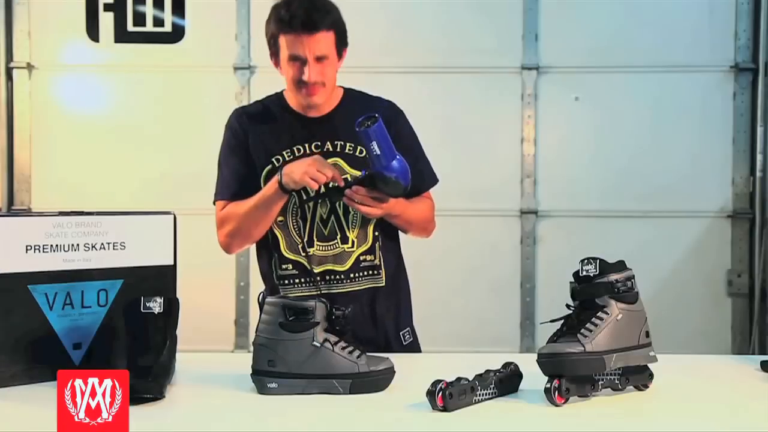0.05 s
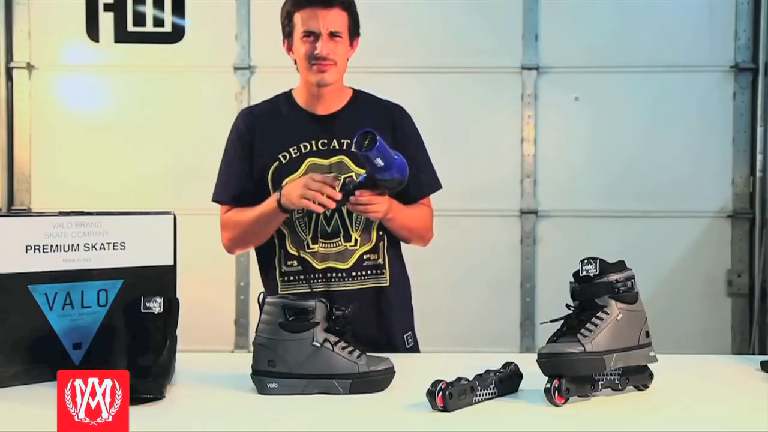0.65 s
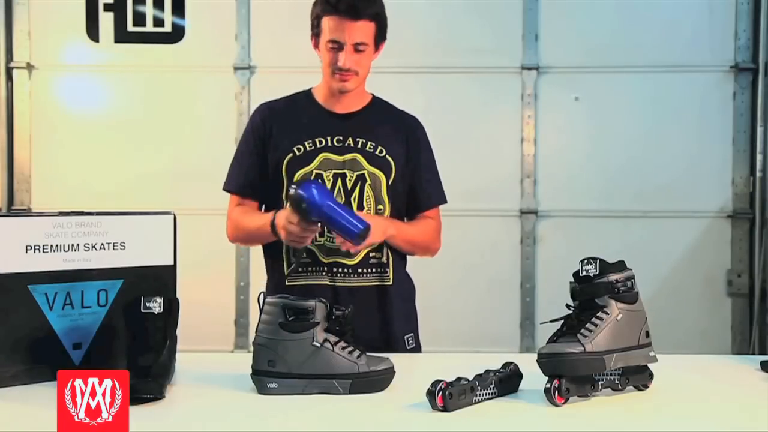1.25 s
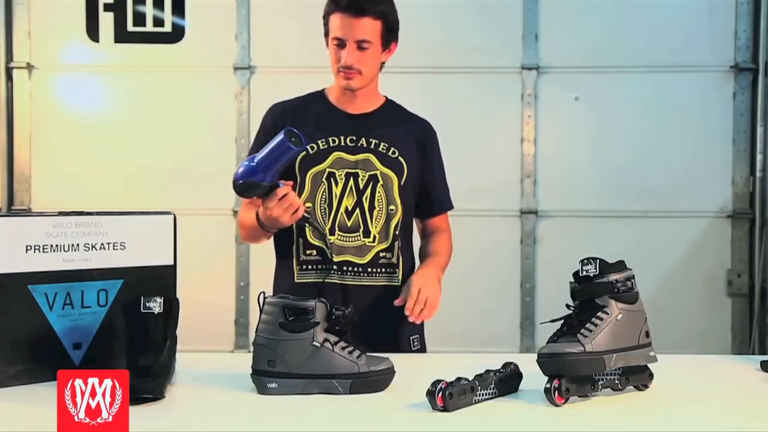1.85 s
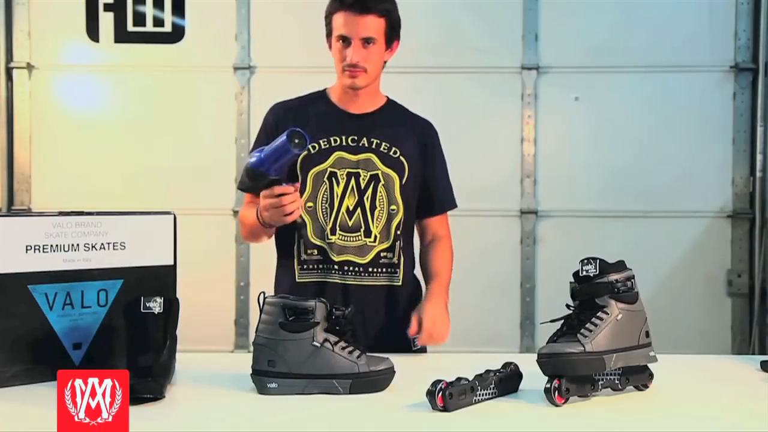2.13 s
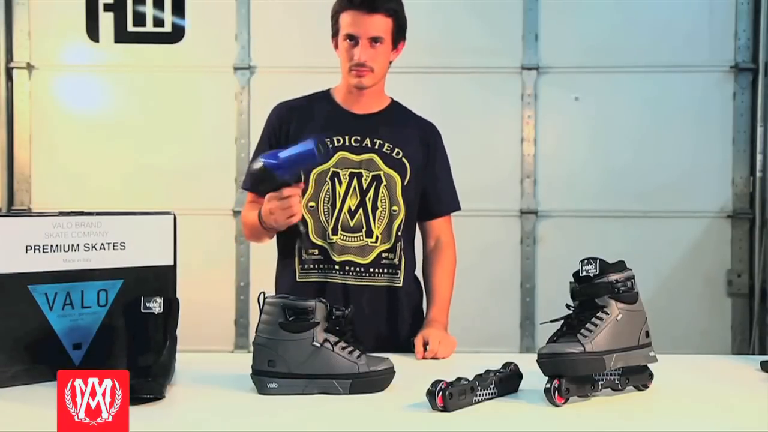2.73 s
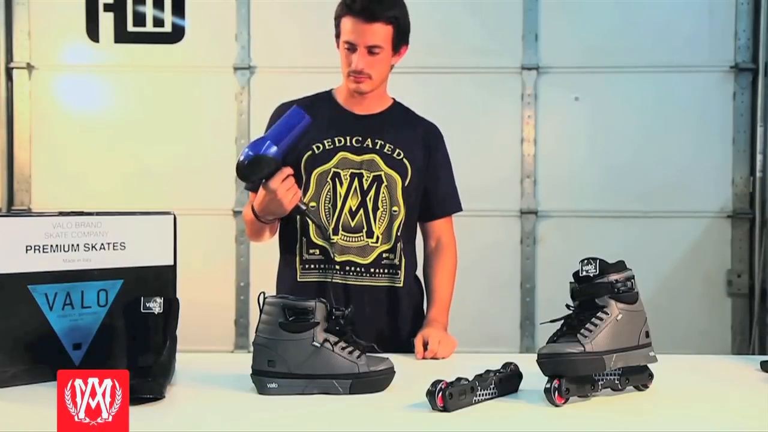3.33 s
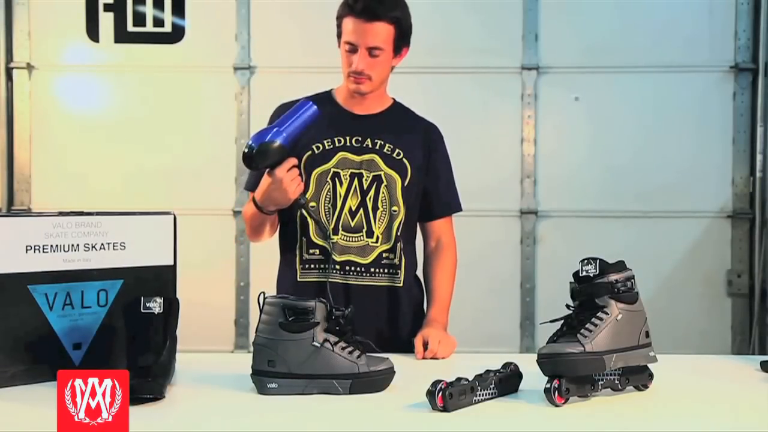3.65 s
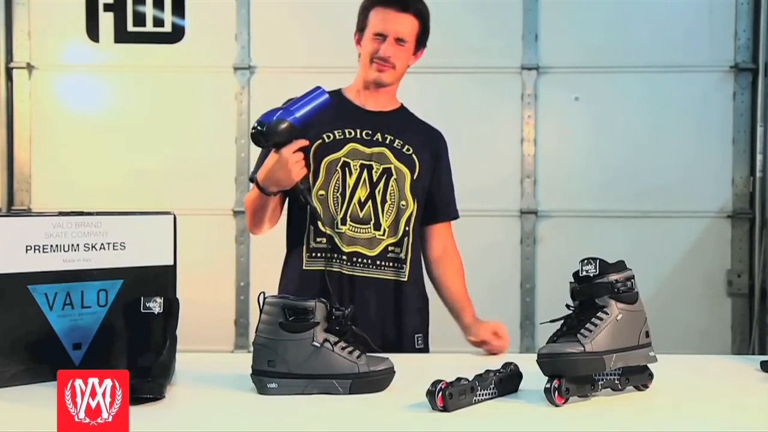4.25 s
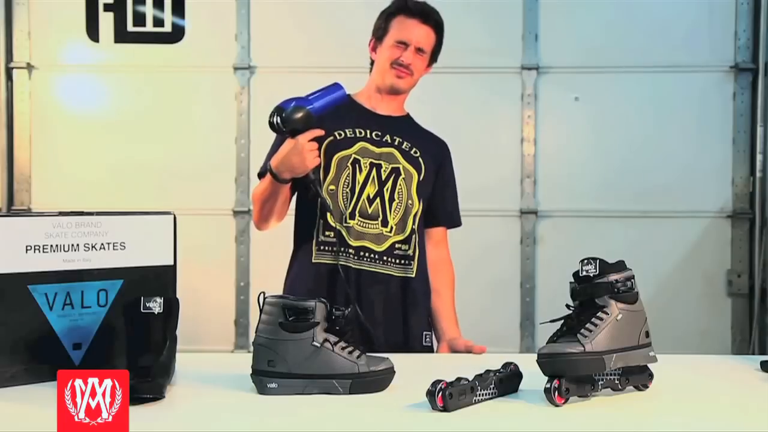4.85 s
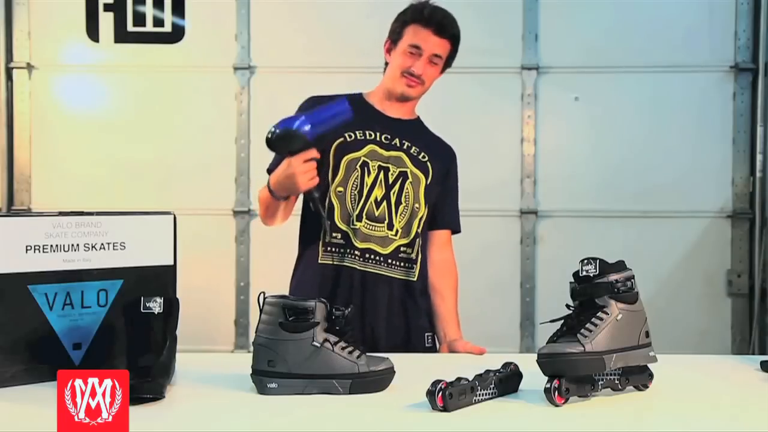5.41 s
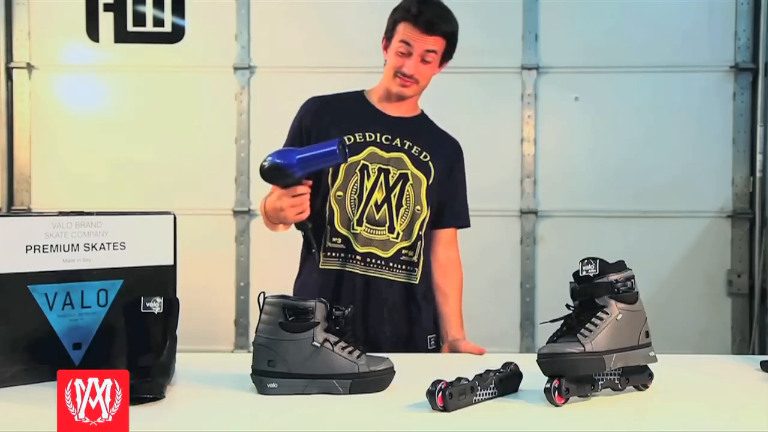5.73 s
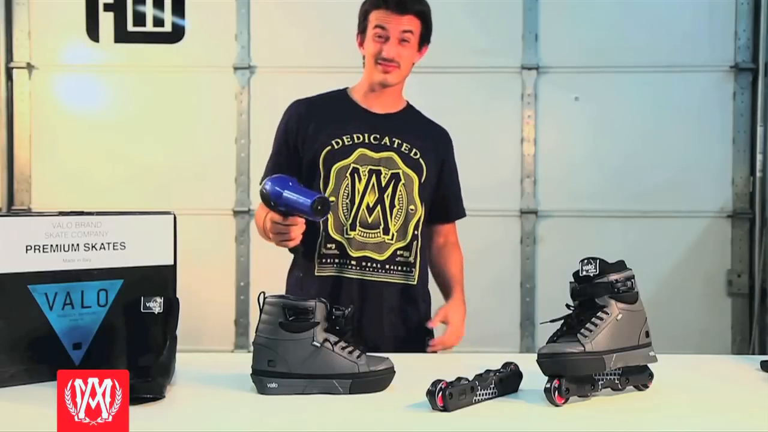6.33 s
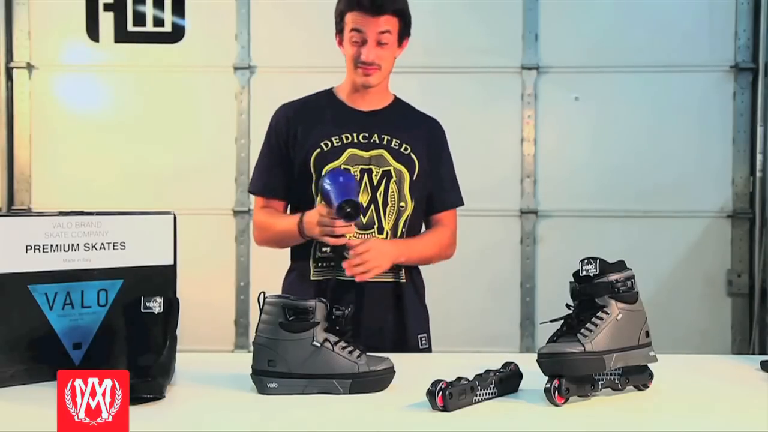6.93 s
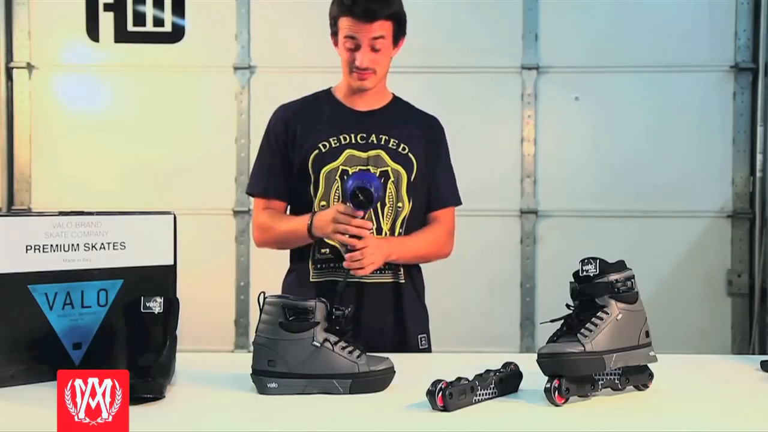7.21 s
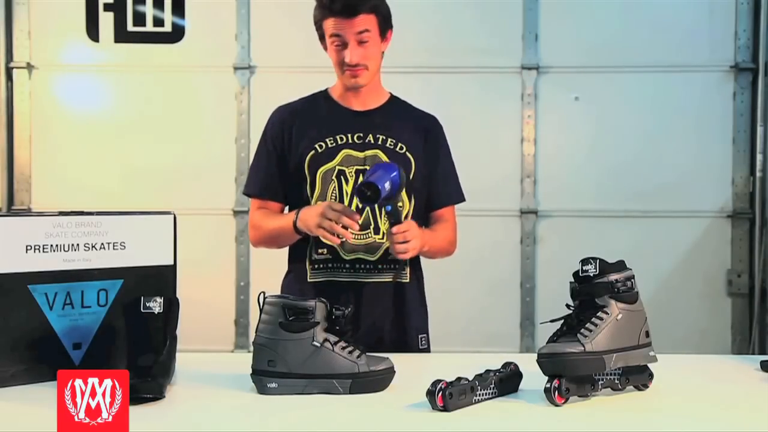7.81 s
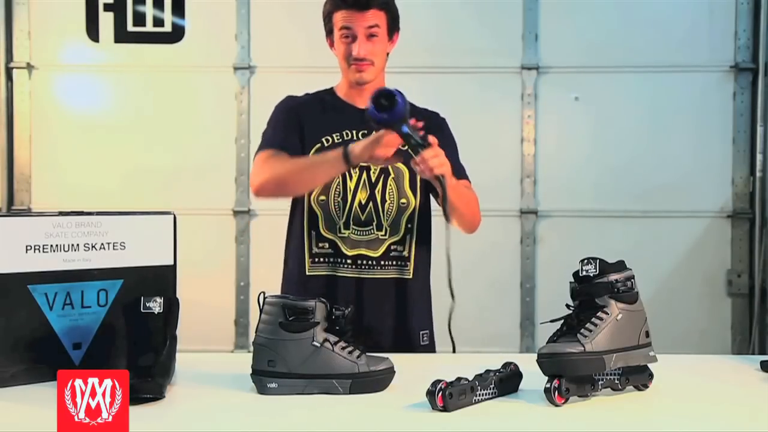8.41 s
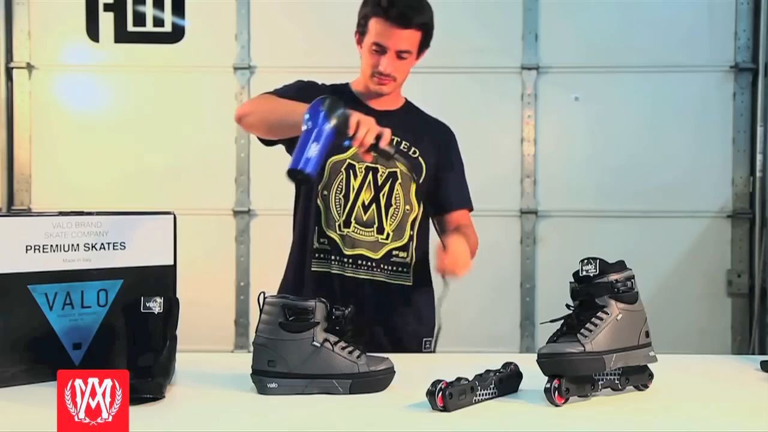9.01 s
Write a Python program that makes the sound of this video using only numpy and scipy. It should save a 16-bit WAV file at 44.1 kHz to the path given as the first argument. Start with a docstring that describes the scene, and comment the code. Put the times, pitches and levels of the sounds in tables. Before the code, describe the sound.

With a plastic switch snap, a hair dryer starts up and keeps blowing, its hiss brightening and dulling slightly as it moves.

```python
"""In a garage, a step or two from the microphone, a handheld hair dryer is switched on and runs.
The switch snaps and rings its plastic shell, then the motor spins up against its inertia. Turbulent air
rushes through the resonant housing and whistles at the grille, over the hum of rotor imbalance and the
whine of the blades. As the dryer is turned about, the beamed hiss brightens and dulls and the tones
swell and fade by interference. Near the end the jet blows on a hand with a hollow, sinking note."""
import sys
import numpy as np
from scipy import signal
from scipy.fft import rfft, irfft, next_fast_len
from scipy.io import wavfile

SR = 44100
rng = np.random.default_rng(int(sys.argv[2]) if len(sys.argv) > 2 else 0)


def transcribe(u):
    """Save the signal u as a 16-bit wav file named by the first command-line argument.

    u: samples, shape (n,) or (channels, n), limited to [-1, 1]; the rate is SR.
    q: integer samples, one column per channel.
    """
    v = np.clip(np.atleast_2d(u).T, -1, 1)
    q = np.round(v * 32767).astype(np.int16)
    wavfile.write(sys.argv[1], SR, q)


N = 403956
TIME = np.arange(N) / SR
FFT_SIZE = next_fast_len(N, True)
BIN_HZ = np.maximum(np.arange(FFT_SIZE // 2 + 1) * SR / FFT_SIZE, 1)
SWITCH_S = .1347


def from_db(db):
    """Amplitude ratio of a level in decibels."""
    return 10 ** (np.asarray(db) / 20)


def rms_one(x):
    """Normalisation to unit rms."""
    return x / np.sqrt(np.mean(x ** 2) + 1e-20)


def in_time(rows):
    """Linear interpolation of each column of a time table at every sample."""
    times, *columns = np.transpose(rows)
    return [np.interp(TIME, times, column) for column in columns]


def spectrum(points):
    """Interpolation of (frequency, value) points on a logarithmic frequency axis."""
    hz, values = np.transpose(points)
    return np.interp(np.log(BIN_HZ), np.log(hz), values)


def colour(x, gain):
    """Zero-phase filtering with one gain per frequency."""
    return irfft(rfft(x, FFT_SIZE) * gain, FFT_SIZE)[:N]


def noise(shape_db):
    """Spectral shaping of white noise, rms 1."""
    return rms_one(colour(rng.standard_normal(N), from_db(shape_db)))


def drift(corner_hz, step=16):
    """Slow random fluctuation: low-pass noise of rms 1, drawn every `step` samples."""
    size = next_fast_len(N // step + 2, True)
    hz = np.arange(size // 2 + 1) * SR / step / size
    slow = irfft(rfft(rng.standard_normal(size)) / (1 + (hz / corner_hz) ** 2), size)
    return np.interp(np.arange(N) / step, np.arange(size), rms_one(slow))


def narrow_noise(pitch_hz, width_hz):
    """Random quadrature modulation: a breathy band around a pitch that may glide, rms 1."""
    angle = 2 * np.pi * np.cumsum(pitch_hz * np.ones(N)) / SR
    return drift(width_hz / 2) * np.cos(angle) + drift(width_hz / 2) * np.sin(angle)


def ring(clicks, hz, t60_s):
    """Damped oscillator: each impulse starts a decaying sine."""
    radius, omega = from_db(-60 / (t60_s * SR)), 2 * np.pi * hz / SR
    return signal.lfilter([0, np.sin(omega)], [1, -2 * radius * np.cos(omega), radius ** 2], clicks + 1e-18)


# Noise spectrum of the still room: (frequency [Hz], relative density [dB])
ROOM_SPECTRUM = [(24, -34), (40, -12), (95, -5), (112, -12), (149, -2), (228, -1), (288, -0.5), (755, -3),
                 (7040, -3.5), (11000, -23), (14300, -73), (22000, -120)]
# Faint hum of the room: (frequency [Hz], level [dB])
ROOM_HUM = [(90, -73.5), (120, -65.5), (143, -68.5)]

def room_tone(hiss_db=-48.5):
    """Ambient noise floor: broadband hiss, with a wavering hum and uneven rumble of narrowband noise."""
    hum = sum(from_db(db) * narrow_noise(hz, width_hz=6) for hz, db in ROOM_HUM)
    rumble = from_db(-71 + 4.5 * drift(4)) * narrow_noise(pitch_hz=62, width_hz=65)
    return from_db(hiss_db) * noise(spectrum(ROOM_SPECTRUM)) + hum + rumble


def garage(x, wet_db=-3.5, build_s=0.0036, t60_s=0.43):
    """Reverberation: dense reflections build up within milliseconds and decay exponentially."""
    t = TIME[:SR]
    tail = rng.standard_normal(SR) * (1 - np.exp(-t / build_s)) * from_db(-60 * t / t60_s)
    return x + from_db(wet_db) * signal.fftconvolve(x, tail / np.linalg.norm(tail))[:N]


def near_echoes(x, count=7, echo_gain=.15, sway_s=.0004):
    """Comb filtering: paths via table, body and door vary as the hand moves, so soft peaks wander."""
    bounced = signal.sosfilt(signal.butter(1, [600, 4000], "band", fs=SR, output="sos"), x)
    out = x
    for delay_s in rng.uniform(.004, .026, count):
        moving_delay_s = delay_s + sway_s * drift(.45)
        out = out + echo_gain * np.interp(TIME - moving_delay_s, TIME, bounced)
    return out * np.std(x) / np.std(out)


# Impacts of the switch contacts: (time after the snap [s], level [dB])
CONTACT_IMPACTS = [(0, 3), (.0007, -19), (.0016, -8), (.0024, -13), (.0035, -10), (.014, -21), (.018, -11)]
# Modes of the plastic shell: (frequency [Hz], gain [dB], decay time T60 [s])
SHELL_MODES = [(735, -40, 0.038), (1340, -29.5, 0.013), (1830, -26, 0.0083), (2740, -26, 0.0087),
               (3700, -18.5, 0.0037), (4930, -9, .003), (5900, -4.5, 0.0017), (7170, -8.5, 0.0016),
               (9500, -22.5, 0.0032)]

def switch(slide_db=-44, slide_s=0.0036):
    """Impact excitation: the slider scrapes, snaps over and chatters, ringing the modes of the shell."""
    force = from_db(slide_db) * rng.standard_normal(N) * np.exp(-np.abs(TIME - SWITCH_S) / slide_s)
    for after_s, db in CONTACT_IMPACTS:
        force[round((SWITCH_S + after_s) * SR)] += from_db(db)
    return sum((-1) ** k * from_db(db) * ring(force, hz, t60_s)
               for k, (hz, db, t60_s) in enumerate(SHELL_MODES))


# Note of the gap between nozzle and hand: (time [s], relative level [dB], frequency [Hz])
HAND_NOTE = [(7.3, -59, 450), (7.55, -47.5, 445), (7.8, -46, 435), (8.05, -52, 425), (8.3, -45, 408),
             (8.48, -47, 392), (8.7, -53, 385), (9.0, -53, 385)]

def jet_on_hand(speed, note_db=0.5, rustle_db=-2.5):
    """Jet impingement on a hand: a low rustle and a hollow note that sinks as the gap widens."""
    level_db, pitch_hz = in_time(HAND_NOTE)
    low_band = signal.butter(2, [130, 560], "band", fs=SR, output="sos")
    rustle = from_db(rustle_db) * rms_one(signal.sosfilt(low_band, rng.standard_normal(N)))
    note = from_db(note_db) * narrow_noise(pitch_hz, width_hz=26)
    return speed * from_db(level_db) * (note + rustle)


# Ring of the barrel, strongest when tilted up and side-on: (time [s], level [dB])
BARREL_LEVEL = [(.7, -54), (1.15, -32), (1.6, -57), (3.0, -38), (3.5, -36.5), (5.0, -36), (5.7, -44),
                (9.1, -45)]

def barrel(speed):
    """Flow-excited resonance: the air stream makes the barrel ring hollowly."""
    return speed ** 3 * from_db(in_time(BARREL_LEVEL)[0]) * narrow_noise(pitch_hz=1920, width_hz=140)


# Whistles of the grille: (frequency [Hz], bandwidth [Hz], level [dB], multiple of the treble swing [-])
GRILLE_WHISTLES = [(6030, 160, -42, 1.5), (7180, 190, -42, 1.9), (8240, 260, -47.5, 3)]

def grille(speed, treble_db):
    """Aeolian tones: air whistles over the bars, beamed more narrowly than the hiss."""
    return speed ** 3 * sum(from_db(db + share * treble_db) * narrow_noise(hz, width_hz)
                            for hz, width_hz, db, share in GRILLE_WHISTLES)


def motor_speed(inertia_s=.195, current_rise_s=.055):
    """Second-order step response: the rotor lags the rising drive. Returns the share of full speed."""
    on_s = np.maximum(TIME - SWITCH_S, 0)
    lag = inertia_s * np.exp(-on_s / inertia_s) - current_rise_s * np.exp(-on_s / current_rise_s)
    return np.clip(1 - lag / (inertia_s - current_rise_s), 1e-6, 1)


# Shaft hum in the standing waves of the room: (time [s], level [dB])
SHAFT_LEVEL = [(0.5, -53), (0.82, -50.8), (0.9, -58), (1.18, -42), (2.3, -47.5), (2.62, -45), (5.3, -51.5),
               (5.94, -42.5), (6.7, -49.5), (8.46, -50), (8.58, -56), (9.1, -47.5)]

def shaft_hum(speed, angle, shimmer_db=1.8):
    """Rotating imbalance: one cycle of hum for each turn of the shaft."""
    level_db = in_time(SHAFT_LEVEL)[0] + shimmer_db * drift(6.6)
    return np.sqrt(2) * speed ** 1.5 * from_db(level_db) * np.sin(angle)


# Blade tone, dropping out where direct and reflected sound cancel: (time [s], relative level [dB])
BLADE_LEVEL = [(0.5, -42), (0.94, -34), (1.06, -46), (1.22, -34), (1.46, -45), (1.58, -36.5), (2.34, -32.5),
               (2.54, -45), (3.06, -35.5), (3.22, -44), (3.42, -33.6), (4.66, -39.5), (5.38, -33.8),
               (5.5, -40), (6.02, -37), (6.1, -46.1), (6.82, -50), (6.94, -34.5), (8.98, -34.5), (9.1, -44)]
# Sideband one shaft rate above the blade tone: (time [s], relative level [dB])
SIDEBAND_LEVEL = [(0.9, -47.5), (0.98, -34), (1.1, -47.2), (1.3, -38), (1.66, -46), (2.46, -35.5),
                  (2.7, -52), (3.62, -36), (4.58, -51), (5.34, -33.5), (5.54, -48), (9.1, -45.2)]
# Octave of the blade tone: (time [s], level [dB])
OCTAVE_LEVEL = [(.9, -47), (2.2, -42.5), (2.7, -45), (3.1, -37.5), (4.3, -38.5), (6.75, -45), (7.3, -38),
                (9.1, -44)]
# Faint upper whine, fading at random: (multiple of the shaft rate [-], level [dB])
UPPER_HARMONICS = [(12, -44), (24, -50), (29, -47)]

def blade_whine(speed, angle, blades=4, shimmer_db=1.8, fade_db=2.5):
    """Blade passage: periodic pressure pulses sound at multiples of the shaft rate."""
    tones = (blades, BLADE_LEVEL, -0.5), (blades + 1, SIDEBAND_LEVEL, -1), (2 * blades, OCTAVE_LEVEL, 0)
    whine = 0
    for order, curve, gain_db in tones:
        level_db = gain_db + in_time(curve)[0] + shimmer_db * drift(19)
        whine += from_db(level_db) * np.sin(order * angle)
    for order, db in UPPER_HARMONICS:
        whine += from_db(db + fade_db * drift(3.8)) * np.sin(order * angle + 0.27 * drift(6))
    return np.sqrt(2) * speed ** 2.4 * whine


def fan(speed, full_speed_hz=283.7, wobble=0.000727):
    """Rotational tones: hum and whine are locked to the angle of one slightly wavering shaft."""
    shaft_hz = full_speed_hz * speed * (1 + wobble * drift(4.3))
    angle = 2 * np.pi * np.cumsum(shaft_hz) / SR
    return shaft_hum(speed, angle) + blade_whine(speed, angle)


# Swing of the mid-range as the dryer is turned about: (time [s], relative level [dB])
MID_SWING = [(0.66, 1.5), (1.46, 0.6), (1.74, -2), (2.38, 0.3), (2.82, -1.2), (3.74, 2.5), (3.94, 0.3),
             (4.26, 1.0), (4.62, -0.7), (4.98, 0), (6.54, -0.8), (6.66, -3), (7.02, 1), (7.14, -0.5),
             (8.02, 1.7), (9.1, -0.6)]
# Swing of the beamed treble with the aim of the nozzle: (time [s], relative level [dB])
TREBLE_SWING = [(0.5, 1), (0.78, 2.5), (1.02, -2.2), (1.1, 0.3), (1.7, 1.1), (1.9, 0.2), (2.5, 2),
                (3.18, -0.2), (3.98, -1), (4.58, 1.4), (4.86, -1), (5.7, -1.5), (6.22, 2), (7.02, 1),
                (7.38, -2.5), (7.58, 1.7), (8.66, -3), (8.94, 3.1), (9.1, 0.5)]

def nozzle_aim():
    """Directivity: the mid and treble levels at the microphone depend on where the dryer points."""
    return in_time(MID_SWING)[0], in_time(TREBLE_SWING)[0]


# Turbulence spectrum at full speed: (frequency [Hz], relative density [dB])
RUSH_SPECTRUM = [(30, -42), (60, -36), (130, -24), (200, -20.5), (280, -13.5), (450, -11.5), (650, -4.5),
                 (1000, -2.5), (1250, -6), (1500, 0.16), (2600, -2.5), (4500, -0.4), (7000, 0.5),
                 (9300, -11.5), (11000, -19.5)]
# Resonances of housing and nozzle: (frequency [Hz], bandwidth [Hz], peak gain [dB])
DUCT_RESONANCES = [(564.4, 8.2, 5.5), (618, 20, 7.5), (712, 28, 3.5), (731.3, 17, 9), (840, 41, 3.5),
                   (947, 32, 7.5), (1450, 56, 3), (1947, 214, 2), (3070, 290, 2.5), (4580, 350, 3),
                   (5280, 240, 2.5), (5960, 230, 3), (6870, 95, 3.5)]
# Directivity by band: (centre frequency [Hz], share of the mid swing [-], share of the treble swing [-])
BAND_DIRECTIVITY = [(600, 0.53, 0.091), (1850, 0.93, -0.079), (5000, .3, 0.52), (8900, 0.05, 1.1)]

def air_rush(speed, mids_db, treble_db, gain_db=-21.5, flutter_db=0.87, sway_db=0.9):
    """Turbulence noise filtered by duct resonances; the treble grows faster with speed than the bass."""
    peaks_db = sum(db / (1 + (2 * (BIN_HZ - hz) / width_hz) ** 2) for hz, width_hz, db in DUCT_RESONANCES)
    turbulence = noise(spectrum(RUSH_SPECTRUM) + peaks_db)
    out = 0
    for k, (centre_hz, mid_share, treble_share) in enumerate(BAND_DIRECTIVITY):
        # Crossover: 1 at this band's centre, 0 at the other centres.
        band_gain = spectrum([(hz, float(hz == centre_hz)) for hz, _, _ in BAND_DIRECTIVITY])
        flow = speed ** (1.73 if k == 0 else 3.57)
        aim_db = mid_share * mids_db + treble_share * treble_db
        level_db = aim_db + flutter_db * drift(23) + sway_db * drift(2)
        out += colour(turbulence, band_gain) * flow * from_db(level_db)
    return from_db(gain_db) * out


def scene():
    """Superposition of dryer, switch and room, the same in both channels."""
    speed = motor_speed()
    mids_db, treble_db = nozzle_aim()
    rush = near_echoes(air_rush(speed, mids_db, treble_db))
    dryer = rush + grille(speed, treble_db) + barrel(speed) + fan(speed)
    mono = dryer + jet_on_hand(speed) + garage(switch()) + room_tone()
    return np.array([mono, mono])


def record(dry, cutoff_hz=11050):
    """Band limiting: an elliptic low-pass cuts the top steeply."""
    return signal.sosfilt(signal.ellip(12, .1, 80, cutoff_hz, fs=SR, output="sos"), dry)


dry = scene()
out = record(dry)
transcribe(out)
```